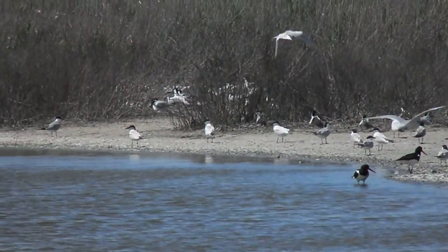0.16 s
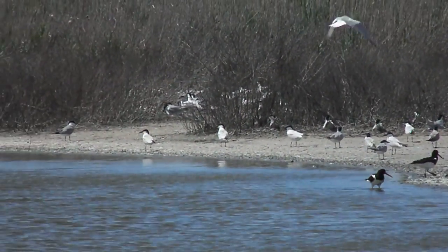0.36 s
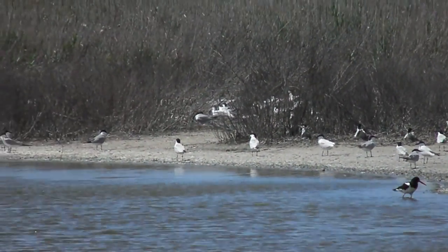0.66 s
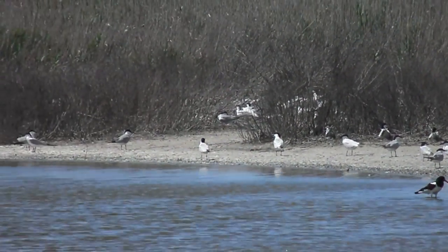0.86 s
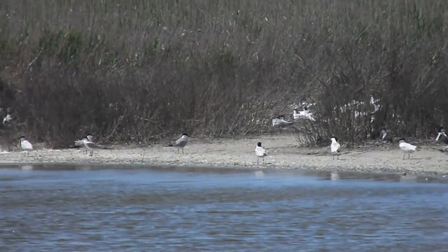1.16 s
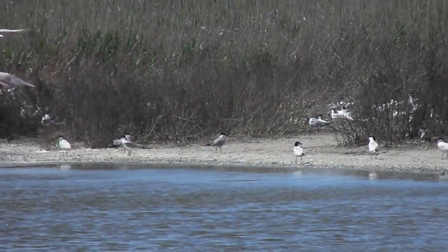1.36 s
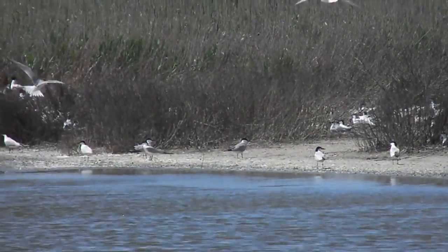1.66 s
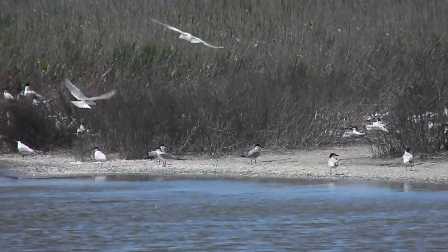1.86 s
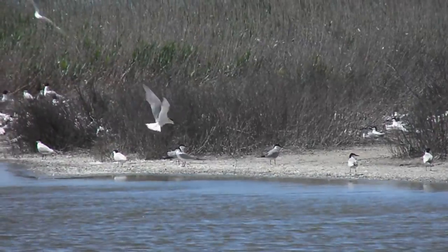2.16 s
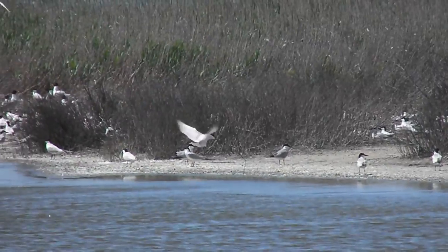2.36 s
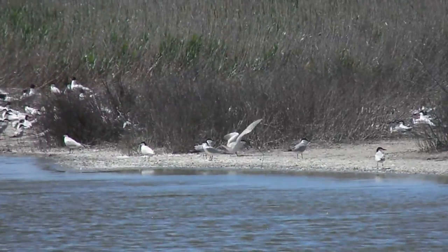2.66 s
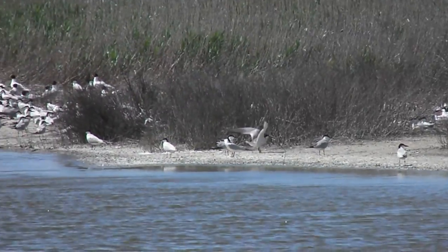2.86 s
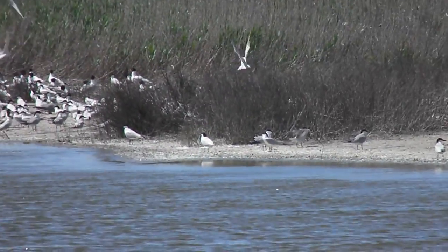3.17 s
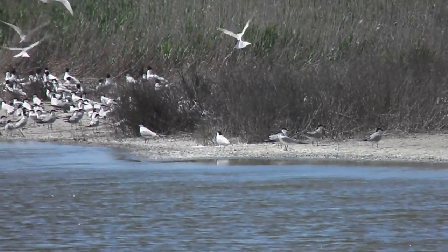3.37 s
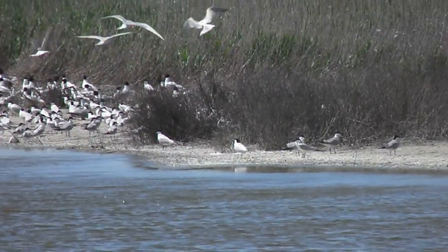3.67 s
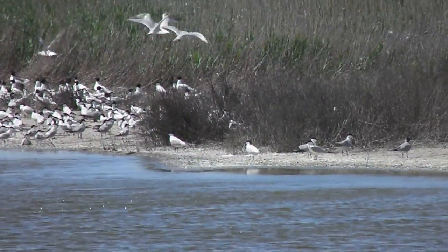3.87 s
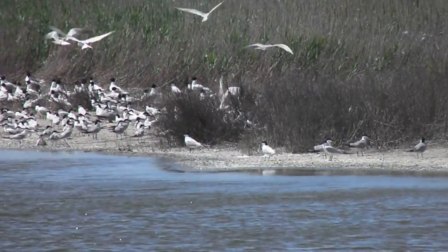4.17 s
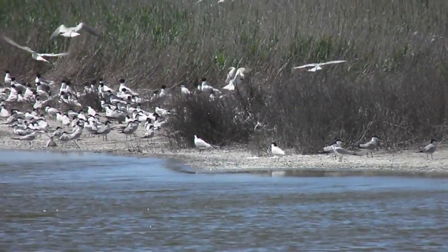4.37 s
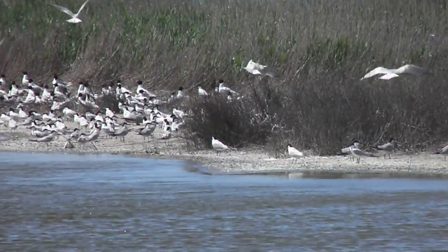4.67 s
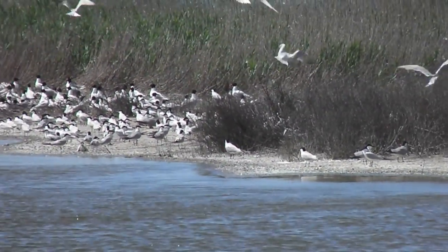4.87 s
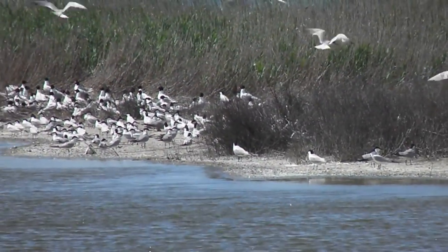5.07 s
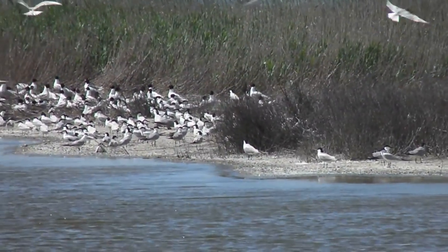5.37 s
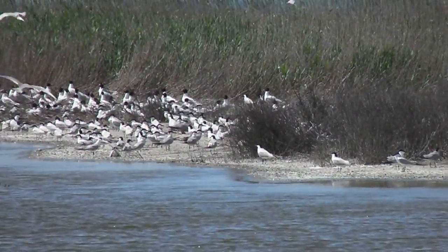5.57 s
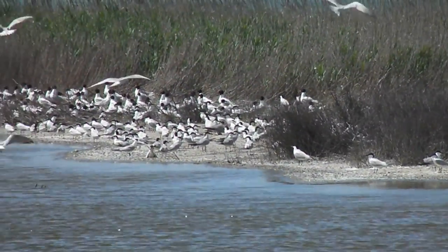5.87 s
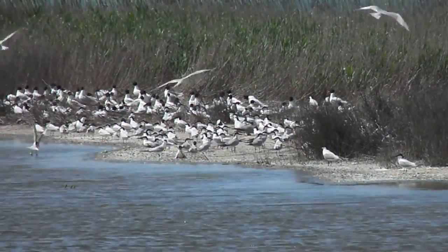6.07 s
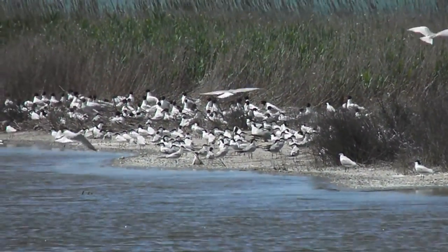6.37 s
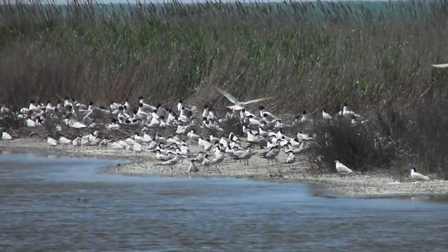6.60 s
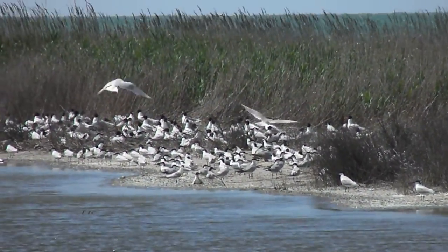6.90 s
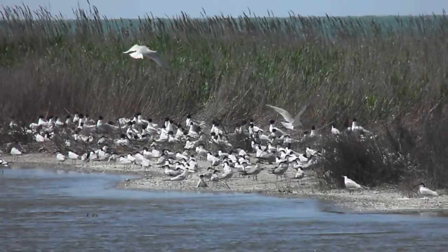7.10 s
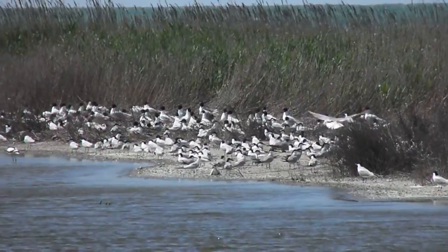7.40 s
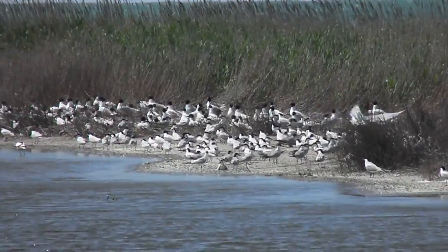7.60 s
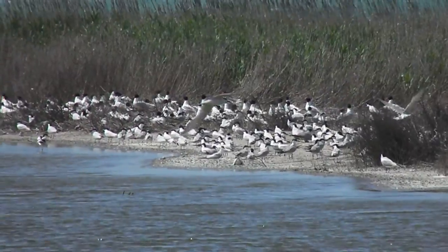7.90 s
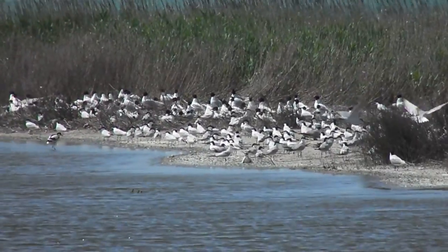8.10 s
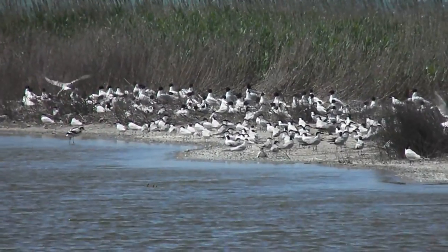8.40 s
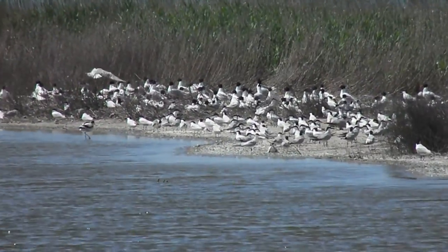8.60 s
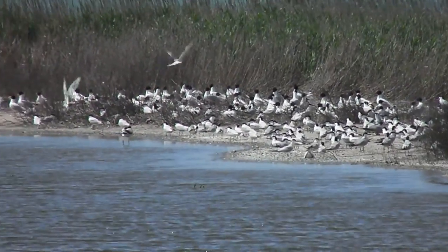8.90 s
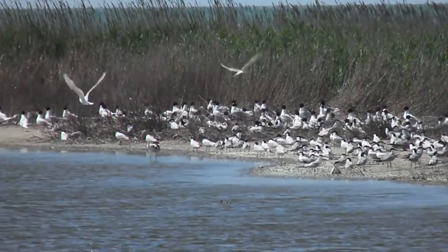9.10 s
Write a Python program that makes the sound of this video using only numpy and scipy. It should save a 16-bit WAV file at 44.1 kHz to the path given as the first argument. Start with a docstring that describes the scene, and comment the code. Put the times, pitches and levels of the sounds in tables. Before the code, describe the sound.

A windy seabird colony across shallow water, lasting a little over nine seconds. A dense, hoarse babble of far yelps and grating cries runs throughout over a light hiss of reeds and ripples. Wind pops batter the microphone in the first 0.7 s, with a strong sharp kip at 0.3. Kips then recur about every 0.3 s, each leaping up and sliding down, with short yelps and thin whistles between. A fast pulsed trill rises from 1.1 to 1.75. A strong yelp stands out near 2.0. Wind thuds cluster around 1.6-2.1 and heavily at 3.3-4.1, ducking the birds. From 4.1 kips come closer together, from more than one bird; another trill starts at 5.05. More buffeting comes at 5.2-5.5, then hard thumps at 6.8 and 7.3. Bright kips stand out at 8.3-8.9 over a swelling crowd, with wind pops continuing towards the end.

```python
"""A seabird colony across shallow water on a windy day: sharp falling kips, gull yelps, thin whistles
and trills over a far crowd of calls and the hiss of reeds and ripples. The birds are gliding tones with
overtones, the hiss is filtered noise. Wind buffets the microphone in short low pops, with flutter and
rumble around them. A gain control ducks the colony under the pops, then lets it climb back steadily;
further dips of the level come some between the pops and some under them."""
import sys
import numpy as np
from scipy import signal
from scipy.fft import rfft, irfft, next_fast_len
from scipy.io import wavfile
from scipy.ndimage import uniform_filter1d

SR = 44100
rng = np.random.default_rng(int(sys.argv[2]) if len(sys.argv) > 2 else 0)


def gain_from_db(level_db):
    """Convert decibel levels to linear amplitude factors (20 dB per decade)."""
    decades = np.asarray(level_db, float) / 20
    return 10 ** decades


def generate_wav(signal):
    """Clip the signal to [-1, 1] and save it as 16-bit WAV at the path in sys.argv[1]."""
    frames = np.transpose(np.atleast_2d(signal))
    scaled = np.clip(frames, -1, 1) * 32767
    pcm = np.round(scaled).astype(np.int16)
    wavfile.write(sys.argv[1], SR, pcm)


N = 407925  # length of the scene in samples

# colour of the wind's flutter and of the wakes behind the pops: (f/Hz, level/dB)
FLUTTER_COLOUR = [(60, -21), (150, -7.5), (250, 1), (450, -7.5), (800, -17), (1500, -26), (3000, -47)]


def evened(x):
    """Scales to an rms (average strength) of 1."""
    return x / np.sqrt(np.mean(x ** 2) + 1e-20)


def noise(size):
    """Plain white noise."""
    return rng.standard_normal(size)


def wobble(size, span):
    """Smooth random waver of rms 1: noise averaged twice over a span of samples."""
    once = uniform_filter1d(noise(size), int(span))
    return evened(uniform_filter1d(once, int(span)))


def curve(rows):
    """Joins the points of a table (t/s, value) into one value per sample."""
    return np.interp(np.arange(N) / SR, *np.transpose(rows))


def coloured(x, points):
    """Filters a sound by a spectrum of (f/Hz, level/dB)."""
    size = next_fast_len(len(x))
    f, db = np.transpose(points)
    hz = np.fft.rfftfreq(size, 1 / SR)
    gain = gain_from_db(np.interp(np.log(hz + 1), np.log(f + 1), db))
    return irfft(rfft(x, size) * gain, size)[:len(x)]


def add(mix, s, sound):
    """Mixes a sound in at time s, in seconds; a start before zero is moved to zero."""
    part = mix[max(round(s * SR), 0):][:len(sound)]
    part += sound[:len(part)]


def flutter():
    """Wind as small random lumps of low noise, and its steady push as a rumble."""
    # strength of the lumpy flutter between the pops: (t/s, level/dB)
    gusts = [(0.0, -33), (0.2, -44.5), (0.62, -40), (1.03, -41), (1.85, -35), (2.86, -39.5), (3.4, -35.5),
             (3.6, -34), (4.3, -47), (4.51, -41.5), (5.44, -39), (5.56, -35), (6.57, -38.5), (6.75, -32.5),
             (8.22, -41), (9.25, -30)]
    # colour of the steady push of the wind: (f/Hz, level/dB)
    rumble_colour = [(25, -50), (60, 0), (130, 6.5), (250, 6.5), (500, -37.5)]
    lumps = noise(N) * gain_from_db(6.8 * wobble(N, 265))
    lumps = gain_from_db(curve(gusts)) * evened(coloured(lumps, FLUTTER_COLOUR))
    rumble = gain_from_db(-39.5) * evened(coloured(noise(N), rumble_colour))
    return lumps, rumble


def whistle(s, length, start_hz, end_hz, level_db):
    """One wavering tone on a glide that bulges upward, with a faint octave."""
    share = np.arange(0, 1, 1 / (length * SR))
    bulge = 1 + 0.0234 * np.sin(np.pi * share)
    hz = (start_hz + (end_hz - start_hz) * share) * bulge
    turn = 2 * np.pi * np.cumsum(hz * (1 + 0.011 * wobble(len(share), 160))) / SR
    tone = np.sin(turn) + gain_from_db(-24) * np.sin(2 * turn)
    loudness = gain_from_db(level_db + 7 + 1.4 * wobble(len(share), 93))
    return s, loudness * tone * signal.windows.tukey(len(share), .35)


def yelp(s, length, top_hz, climb, level_db, beak_hz, jitter=0.0048):
    """A stack of harmonics that climbs, then drops; the open beak favours those near its resonance."""
    # shape of the pitch: (share of the call, share of the climb still below the top)
    arch_points = [(0, 1), (.1, .75), (.72, 0), (.86, .15), (1, .8)]
    share = np.arange(0, 1, 1 / (length * SR))
    size = len(share)
    arch = 1 - climb * np.interp(share, *np.transpose(arch_points))
    turn = 2 * np.pi * np.cumsum(top_hz * arch * (1 + jitter * wobble(size, 93))) / SR
    stack = np.zeros(size)
    for k in range(1, 12):
        distance = abs(np.log(k * top_hz / beak_hz) / 0.36)
        stack += np.sin(k * turn + k * k) / (1 + distance ** 2.67)
    stack *= 1 + .15 * wobble(size, 14)  # breath roughens each swing
    waver_db = 1.5 * wobble(size, 300)
    swell = signal.windows.tukey(size, .25) * (.7 + .5 * share)
    return s, gain_from_db(level_db + waver_db) * evened(stack) * swell


def rasp(length, rate_hz):
    """A grating cry: breath chopped by an uneven flutter of the throat."""
    size = round(length * SR)
    beat = np.cumsum(rate_hz * (1 + .2 * wobble(size, 100))) / SR % 1
    return np.exp(-beat / 0.35) * noise(size) * np.hanning(size) ** .5


def crowd(count=300):
    """Hundreds of hoarse yelps and grating cries from far birds, smeared by reeds and water."""
    # far calls running together: (t/s, level/dB)
    crowd_level = [(0.0, -36), (1.05, -33), (2.47, -35), (3.73, -37), (4.12, -34), (4.3, -30.5),
                   (5.05, -34.5), (5.49, -36.5), (5.72, -38), (6.52, -33), (6.77, -37.5), (7.52, -32.5),
                   (7.63, -37), (7.83, -44.5), (8.45, -28.5), (9.25, -53)]
    # colour of the grating cries: (f/Hz, level/dB)
    rasp_colour = [(410, -26), (700, -3), (822, 2), (1140, -13.5), (1630, -22), (1950, -8.5), (2500, -0.5),
                   (3910, -17), (4790, -9), (9000, -30), (11700, -28), (19800, -120)]
    calls, rasps = np.zeros((2, N))
    for s, length, pitch, size, beak, bend in rng.random((count, 6)):
        call = yelp(s * N / SR, .04 + .07 * length, 720 + 300 * pitch, 0.06055 + .2 * bend,
                    -12 * size, 1500 + 1500 * beak, jitter=0.015)
        add(calls, *call)
        cry = rasp(0.028 + .06 * beak, 120 + 200 * size)
        add(rasps, (1 - s) * N / SR, gain_from_db(-14 * bend) * cry)
    t = np.arange(SR // 4) / SR
    echo = noise(len(t)) * gain_from_db(-60 * t / 0.033)  # falls by 60 dB in 33 ms
    smear = evened(signal.oaconvolve(calls, echo)[:N])
    grating = evened(coloured(rasps, rasp_colour))
    return gain_from_db(curve(crowd_level)) * evened(evened(calls) + 0.45 * smear + 0.72 * grating)


def reeds_and_ripples():
    """Reeds and ripples: noise shaped into a hiss whose level flickers."""
    # colour of the hiss: (f/Hz, level/dB)
    hiss_colour = [(60, -6), (400, 14.5), (1200, 3), (4000, 1), (8000, -5.5), (11000, -14.5), (14000, -16),
                   (16000, -34)]
    flicker_db = 2.5 * wobble(N, 300)
    return gain_from_db(-41.5 + flicker_db) * evened(coloured(noise(N), hiss_colour))


def pop(s, peak_db, hz, phase, width):
    """An eddy hits the diaphragm: a swing or two; the harder ones carry a sharper edge."""
    turns = np.arange(-2.5, 2.5, hz / SR)
    swing = np.exp(-(turns / (0.44 + 0.49 * width)) ** 2) * np.sin(2 * np.pi * (turns + phase))
    edge = np.exp(-(turns / 0.22) ** 2) * np.sin(2 * np.pi * (1.82 * turns + 3 * phase))
    return s + turns[0] / hz, gain_from_db(peak_db) * (swing + 1.8 * gain_from_db(peak_db) * edge)


def pops():
    """Strong pops and lesser eddies round them, with a brief rush of air and a turbulent wake."""
    # the strong wind pops on the microphone, before the low cut: (t/s, level/dB, f/Hz)
    strong_pops = [(0.043, -13, 327), (0.057, -13.5, 680), (0.077, -8.5, 435), (0.152, -8, 536),
                   (0.186, -12, 434), (0.424, -19, 362), (0.437, -11.5, 407), (0.446, -22, 392),
                   (0.483, -16, 434), (0.499, -9, 740), (0.521, -10, 484), (0.536, -14, 370),
                   (0.547, -12.5, 731), (0.564, -8, 452), (0.58, -14, 510), (0.589, -17, 662),
                   (0.611, -15.0, 382), (0.661, -14.5, 467), (1.124, -18.0, 358), (1.239, -11.5, 396),
                   (1.61, -13, 440), (1.631, -16, 462), (1.64, -13, 413), (1.663, -10.0, 387),
                   (1.682, -6.5, 680), (1.724, -8, 493), (1.796, -18.5, 456), (1.981, -19.5, 429),
                   (2.003, -19, 354), (2.036, -11, 330), (2.062, -16, 378), (2.09, -21, 501),
                   (2.099, -11, 425), (2.383, -12.5, 432), (2.463, -11.0, 450), (2.47, -17, 458),
                   (2.479, -17, 325), (2.782, -8.5, 545), (2.938, -17.5, 338), (2.959, -14, 630),
                   (3.065, -17.5, 418), (3.091, -20.5, 377), (3.104, -15, 408), (3.264, -12.5, 473),
                   (3.274, -18.0, 370), (3.294, -11.5, 406), (3.43, -20, 381), (3.443, -12, 542),
                   (3.468, -15, 394), (3.487, -13, 409), (3.497, -10.5, 590), (3.514, -8, 456),
                   (3.549, -17.0, 540), (3.578, -16, 405), (3.595, -8.5, 678), (3.629, -10.5, 540),
                   (3.646, -24, 391), (3.661, -11.5, 828), (3.67, -8, 467), (3.683, -15.0, 490),
                   (3.702, -19, 431), (3.716, -13, 630), (3.735, -13, 367), (3.76, -12, 766),
                   (3.778, -9, 504), (3.801, -20, 586), (3.916, -16.5, 436), (3.932, -11.5, 358),
                   (3.941, -12.5, 464), (3.967, -14.5, 425), (4.04, -15, 382), (4.115, -13.5, 408),
                   (4.676, -15.5, 400), (4.69, -8, 376), (5.216, -14, 435), (5.232, -15.5, 455),
                   (5.243, -19, 520), (5.254, -9.5, 570), (5.278, -11, 465), (5.285, -27, 435),
                   (5.304, -12, 465), (5.317, -26, 480), (5.331, -13.5, 388), (5.373, -13.5, 478),
                   (5.391, -12, 472), (5.398, -17, 431), (5.413, -9, 480), (5.439, -14, 360),
                   (5.475, -17, 440), (5.482, -4.5, 610), (5.516, -10, 433), (5.795, -16.5, 475),
                   (6.129, -17, 386), (6.582, -17, 368), (6.66, -17, 407), (6.682, -18, 338),
                   (6.692, -12, 415), (6.8, -4.5, 496), (6.811, -12.5, 495), (6.84, -8, 890),
                   (6.899, -14.5, 414), (7.118, -17.5, 352), (7.164, -13.5, 328), (7.278, -4, 520),
                   (7.289, -14, 508), (7.334, -7, 513), (7.349, -9.5, 435), (7.584, -12.0, 398),
                   (7.594, -15, 448), (7.646, -15.5, 350), (7.749, -20, 469), (7.757, -13.5, 386),
                   (7.789, -15, 420), (8.068, -11.5, 394), (8.163, -9.5, 464), (8.172, -7, 470),
                   (8.183, -21, 410), (8.234, -15, 520), (8.577, -14, 464), (8.593, -10, 323),
                   (8.622, -19, 419), (8.635, -19, 572), (8.647, -17.5, 534), (8.828, -11, 373),
                   (8.949, -11, 496), (9.054, -19, 384), (9.105, -15.5, 491), (9.13, -13.5, 660)]
    small_chance = 10.5 * N / SR / len(strong_pops)  # 10.5 small pops per second on average
    out = np.zeros(N)
    draws = rng.random((len(strong_pops), 6))
    for (s, db, hz), (phase, width, chance, lag, size, tone) in zip(strong_pops, draws):
        add(out, *pop(s, db, hz, phase, width))
        if chance < small_chance:
            small_s = s + .04 * (lag - .4)
            small_db = db - 4.5 * (.5 + size)
            add(out, *pop(small_s, small_db, 367 * (0.92 + .5 * tone), width, phase))
    strength = uniform_filter1d(out ** 2, 60)  # squared, so mostly the hardest pops rush in the treble
    air = evened(coloured(noise(N), [(1500, -30), (3000, 0), (16000, -30)]))
    rush = gain_from_db(-24) * strength * air
    # the wake dies away over about 4.4 ms
    fading = signal.lfilter([1], [1, -np.exp(-1 / (0.0044 * SR))], abs(out)) / (0.0061 * SR)
    wake = gain_from_db(3.5) * fading * evened(coloured(noise(N), FLUTTER_COLOUR))
    low_cut = signal.butter(2, 150, "high", fs=SR, output="sos")
    return signal.sosfilt(low_cut, out) + rush + wake


def dips(wind):
    """Gain control: falls with the power of the pops, and at listed dips, then climbs back steadily."""
    # further dips, some between the pops and some under them, before smoothing: (t/s, depth/dB)
    extra_dips = [(.004, 6.5), (0.41, 10), (.715, 7), (1.32, 6.5), (1.768, 15), (2.324, 14.5), (2.419, 5.5),
                  (3.213, 21), (3.324, 7), (3.652, 25), (3.696, 29.5), (3.897, 8), (.035, 6), (5.751, 5.5),
                  (8.983, 9.5), (9.055, 14.5), (5.195, 13.5), (6.461, 8.5), (6.634, 11), (6.743, 24.5),
                  (6.917, 18.5), (7.131, 14.5), (7.198, 18.5), (7.415, 12), (7.499, 13.5), (7.729, 22.5),
                  (7.923, 15.5), (8.203, 18.5), (9.217, 15)]
    window_s, duck_from_db, duck_slope, recovery_db_per_s = 0.0052, -30, 1.086, 152
    wind_power = abs(uniform_filter1d(wind ** 2, round(window_s * SR)))
    power_db = 10 * np.log10(wind_power + 1e-12)
    depth_db = duck_slope * np.maximum(power_db - duck_from_db, 0)
    for s, db in extra_dips:
        depth_db[round(s * SR)] = db
    climb = np.arange(N) * recovery_db_per_s / SR
    # the deepest dip so far holds, less what has been regained since
    held_db = np.maximum.accumulate(depth_db + climb) - climb
    return gain_from_db(-uniform_filter1d(held_db, 60))


def gull(s, length, top_hz, level_db, beak_hz):
    """A near yelp: the further its top pitch lies from a calm 850 Hz, the further it climbs."""
    push = min(.0011 * abs(top_hz - 850), .15)
    return yelp(s, length, top_hz, 0.0684 + push, level_db, beak_hz)


def kip(s, level_db, top_hz, second_db):
    """A near sine leaps up and slides down; overtones flash at the top, and the start is hoarse."""
    # harmonics 2 to 4: (level under the second harmonic's setting/dB, how fast it fades on the slide)
    upper_harmonics = [(-0.5, 1.25), (-14, 0.31), (-22.5, 0.61)]
    leap_s, slide_s, round_s = 0.018, .049, 0.00916  # the last rounds over the top
    t = np.arange(-leap_s, slide_s, 1 / SR)
    before = np.maximum(-t / leap_s, 0)
    after = np.maximum(t, 0)
    slide = np.hypot(after, round_s) - round_s
    steepness = .36 + 0.00039 * max(3450 - top_hz, 0)  # lower-voiced birds slide further
    pitch = 1 - .45 * before ** 2.8 - steepness * np.tanh(1.6 * slide / slide[-1])
    turn = 2 * np.pi * np.cumsum(top_hz * pitch) / SR
    low_db = -14 * before ** 0.65 - 18.5 * (after / slide_s) ** 3
    high_db = -15.4 * before - 30 * np.tanh((after / 0.023) ** 1.7)
    upper = np.zeros(len(t))
    for k, (db, fade) in enumerate(upper_harmonics, 2):
        upper += gain_from_db(db + fade * high_db) * np.sin(k * turn)
    # while the voice sets in: lines half way between the harmonics, and breath
    breath = 1.2 * uniform_filter1d(noise(len(t)), 4)
    hoarse = np.sin(1.5 * turn) + np.sin(2.5 * turn) + breath
    onset = gain_from_db(-14.5) * np.exp(-((t + 0.0082) / 0.0038) ** 2)
    sound = gain_from_db(low_db) * np.sin(turn) + gain_from_db(second_db) * upper + onset * hoarse
    return s - leap_s, gain_from_db(level_db + 2 + 1.4 * wobble(len(t), 90)) * sound


def trill(s, length, start_hz, level_db):
    """A rising, wavering tone chopped into blips that start a little fast."""
    t = np.arange(0, length, 1 / SR)
    pace = 57.3 * (1 + .1 * np.exp(-t / .1))  # blips per second
    gate = np.sin(np.pi * np.clip(np.cumsum(pace) / SR % 1 / .75, 0, 1)) ** 2
    hz = start_hz * (1 + .08 * t + 0.0067 * wobble(len(t), 320))
    turn = 2 * np.pi * np.cumsum(hz) / SR
    loudness = gain_from_db(level_db + 8 + 3 * wobble(len(t), 900))
    return s, loudness * gate * np.sin(turn) * signal.windows.tukey(len(t), .1)


def shore(x):
    """Bounces off water and sand: a faint short tail of fading noise, starting after 4 ms."""
    t = np.arange(SR // 5) / SR
    tail = noise(len(t)) * gain_from_db(-60 * t / 0.16) * (t > .004)
    return x + gain_from_db(-19.0) * signal.oaconvolve(x, tail / np.linalg.norm(tail))[:N]


def colony(dip):
    """Near birds, which ride the dips a little better, over the far crowd and the hiss."""
    # Levels here are settings that each voice shapes further.
    # thin gliding whistles: (t/s, length/s, start f/Hz, end f/Hz, level/dB)
    whistle_rows = [(0, 0.041, 2840, 2050, -34.5), (0.118, 0.029, 4600, 4640, -40.5),
                    (0.317, .032, 5100, 4660, -42.5), (.454, 0.028, 2300, 1870, -52),
                    (.647, 0.15, 2280, 2050, -48), (0.672, 0.033, 4770, 4480, -41),
                    (0.924, .07, 2528, 2170, -36.5), (1.22, 0.047, 4800, 4360, -39),
                    (1.397, 0.043, 2960, 2430, -30.5), (1.423, .12, 2364, 2180, -33.5),
                    (1.789, 0.1, 2580, 1960, -39), (1.812, 0.027, 4760, 4765, -41),
                    (1.969, .1, 5050, 5000, -43), (2.899, 0.071, 4980, 5150, -46),
                    (3.003, 0.084, 5030, 4600, -45), (3.55, .06, 4550, 4900, -53),
                    (.497, 0.072, 3200, 3070, -47), (0.786, .09, 5070, 4850, -49),
                    (4.03, .05, 4750, 4700, -52), (4.785, 0.045, 2440, 1900, -39),
                    (2.626, 0.05, 1850, 1930, -38), (2.813, 0.076, 2850, 2110, -36),
                    (2.96, .053, 2400, 1900, -47), (3.94, 0.051, 2300, 1680, -41),
                    (4.42, 0.027, 1700, 1500, -40), (5.344, 0.06, 2320, 2788, -48),
                    (5.482, 0.067, 2840, 2120, -35), (6.918, 0.041, 2320, 2000, -35.5),
                    (6.217, .1, 4430, 4500, -47.5), (6.223, 0.086, 2960, 3000, -54),
                    (0.035, 0.073, 2100, 2650, -40), (7.419, .039, 2920, 3050, -43),
                    (8.415, .038, 4940, 5520, -43.5), (8.527, 0.026, 5250, 5520, -41)]
    # gull yelps: (t/s, length/s, top f/Hz, level/dB, beak resonance f/Hz)
    yelp_rows = [(0.069, 0.054, 870, -34, 2668), (.688, 0.047, 830, -35.5, 2600),
                 (0.857, 0.036, 877, -39, 3256), (1.387, 0.054, 1010, -34, 3260),
                 (1.487, 0.043, 870, -36, 3380), (1.766, 0.043, 900, -31.5, 2430),
                 (1.814, 0.054, 823, -38, 2804), (1.978, 0.082, 888, -33, 3260),
                 (2.017, 0.038, 842, -24, 2750), (2.069, 0.048, 833, -39, 1900),
                 (2.152, 0.047, 850, -43, 1960), (2.306, 0.063, 964, -26, 2370),
                 (2.48, 0.056, 850, -46, 3070), (2.593, 0.046, 914, -34.5, 2460),
                 (2.639, 0.063, 722, -33, 2500), (2.699, .044, 946, -34, 2320), (3, 0.071, 836, -31, 2160),
                 (3.081, 0.051, 947, -31, 2140), (3.225, .056, 866, -39, 3560),
                 (3.256, 0.069, 1010, -33, 4100), (3.355, 0.062, 928, -32.5, 3940),
                 (4.068, 0.075, 806, -32.5, 1850), (4.283, 0.087, 945, -30, 2190),
                 (4.525, 0.062, 894, -32.5, 2190), (4.556, 0.039, 827, -36, 2442),
                 (4.729, 0.092, 820, -32, 2210), (4.906, .071, 772, -32.5, 2320),
                 (4.926, 0.036, 1544, -28.5, 3300), (8.245, 0.048, 907, -44, 2650),
                 (7.176, .06, 925, -49, 3500), (5.687, 0.049, 956, -27.5, 2280),
                 (5.607, 0.0446, 1002, -36.5, 1850), (5.864, 0.068, 977, -36, 2180),
                 (6.367, 0.084, 912, -27.5, 3230), (6.482, 0.043, 888, -30, 2880),
                 (6.546, 0.052, 758, -31, 2500), (6.943, 0.036, 850, -35, 2940),
                 (6.976, 0.053, 940, -35.5, 3180), (7.078, .04, 946, -42, 3003),
                 (7.445, 0.047, 867, -32, 2550), (8.377, 0.069, 910, -35.5, 2840),
                 (9.04, 0.018, 880, -57, 2930), (9.209, 0.089, 850, -29.5, 3030)]
    # sharp falling kips: (t at the pitch top/s, level/dB, top f/Hz, second harmonic level/dB)
    kip_rows = [(0.279, -16, 3420, -18), (0.606, -33.5, 3370, -13), (0.885, -19.5, 3390, -8.5),
                (1.129, -21, 3430, -8), (1.365, -21.5, 3400, -10), (1.629, -24.5, 3430, 0.5),
                (1.922, -20.5, 3425, -7), (2.202, -29, 3410, -4.5), (2.501, -33.5, 3350, -1.5),
                (2.815, -29.5, 3300, -10), (3.132, -24.5, 3240, -13), (3.454, -27, 3340, -30),
                (3.777, -29, 3290, -16), (4.105, -21.5, 3280, -18), (4.142, -26, 3220, -14),
                (4.352, -25, 3230, -18), (4.404, -19, 3480, -7.5), (4.677, -21, 3210, -10.5),
                (4.687, -22, 3480, -25), (4.797, -33.5, 3320, -11), (4.976, -19.5, 3424, -12),
                (5.272, -26.5, 3516, -5), (5.475, -36, 3270, 1), (5.57, -20.5, 3480, -5),
                (5.721, -27.5, 3270, -4), (5.827, -27.5, 3490, -11), (5.935, -28.5, 3230, -4),
                (6.09, -22, 3490, -0.5), (6.173, -27, 3320, -4.5), (6.353, -24.5, 3440, -4),
                (6.425, -33, 3230, -2.5), (6.607, -27.5, 3500, -1), (6.655, -30.5, 3230, -8),
                (6.852, -33, 3600.0, -12), (7.093, -29.5, 3495, 1), (7.337, -21, 3480, -2.5),
                (7.398, -30, 3310, -8), (7.582, -24, 3430, -12), (7.654, -34.5, 3360, -10),
                (7.823, -32, 3410, -10), (7.956, -30, 3270, -19.2), (8.081, -21, 3470, -10),
                (8.33, -16.5, 3490, -8), (8.462, -23.5, 3315, -5), (8.576, -16.5, 3470, -4),
                (8.698, -26.5, 3240, -15), (8.855, -18, 3310, -6.5), (8.975, -31, 3290, -2.5),
                (9.132, -28, 3390, -9), (9.209, -43, 3360, -25)]
    # trills of short blips: (t/s, length/s, start f/Hz, level/dB)
    trill_rows = [(1.12, .63, 2740, -36.5), (5.047, 0.66, 2800, -40), (2.66, .13, 3620, -43.5),
                  (3.83, 0.16, 3470, -51)]
    near = np.zeros(N)
    voices = ((whistle, whistle_rows), (gull, yelp_rows), (kip, kip_rows), (trill, trill_rows))
    for voice, rows in voices:
        for row in rows:
            add(near, *voice(*row))
    far = crowd() + reeds_and_ripples()
    return shore(near) * dip ** 0.72 + far * dip


def scene():
    """Colony, flutter and rumble under the gain control (the wind gives way less), plus the pops."""
    lumps, rumble = flutter()
    wind = pops()
    dip = dips(wind)
    return (colony(dip) + lumps * dip ** 0.073 + rumble * dip ** 0.27 + wind)[None]


def top_cut(x):
    """Nothing passes above the cut-off."""
    return signal.sosfilt(signal.butter(12, 16490, fs=SR, output="sos"), x)


def record(dry):
    """The microphone's low cut, soft overload and narrow housing dip; the top treble is also cut off."""
    low_cut = signal.butter(2, 40, "high", fs=SR, output="sos")
    cut = signal.sosfilt(low_cut, dry)
    soft = .85 * np.tanh(cut / .85)
    treble_limit = signal.firwin(511, 15850, window=("kaiser", 9), fs=SR)  # not part of the microphone
    limited = signal.oaconvolve(soft, treble_limit[None], "same")
    b, a = signal.iirnotch(7810, 35, SR)  # housing dip at 7810 Hz
    finished = signal.lfilter(b, a, limited)
    return top_cut(finished)


dry = scene()
out = record(dry)
generate_wav(out)
```